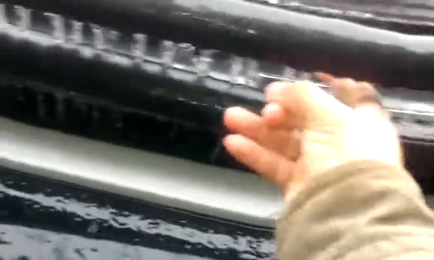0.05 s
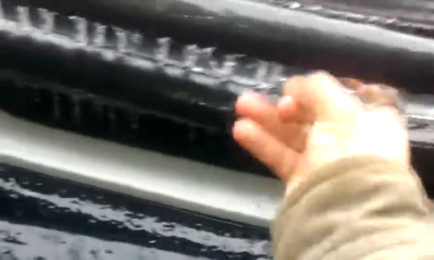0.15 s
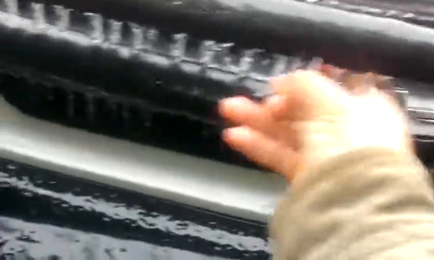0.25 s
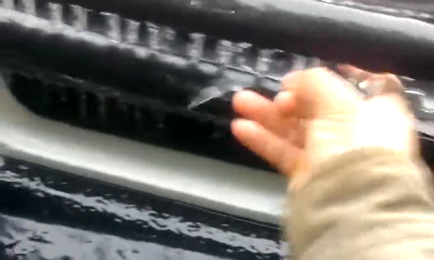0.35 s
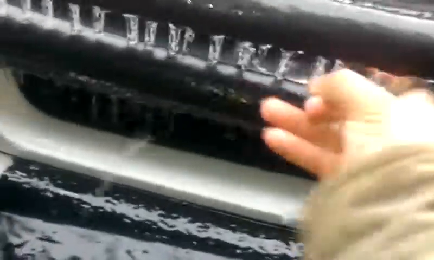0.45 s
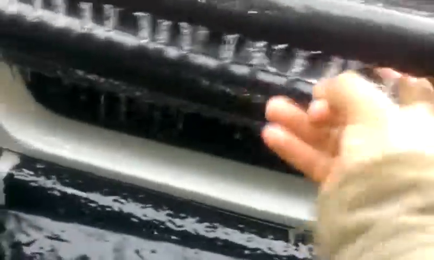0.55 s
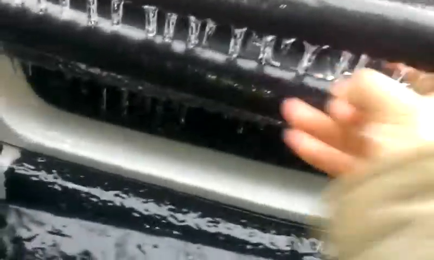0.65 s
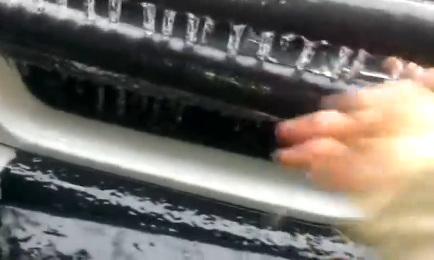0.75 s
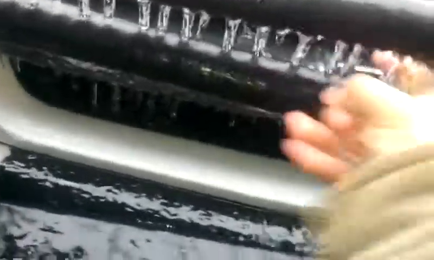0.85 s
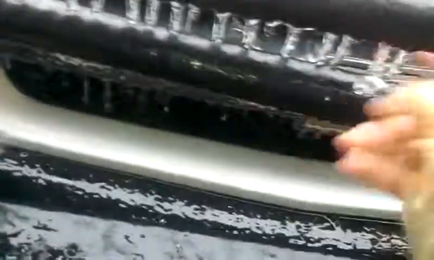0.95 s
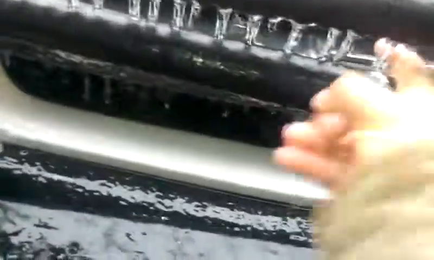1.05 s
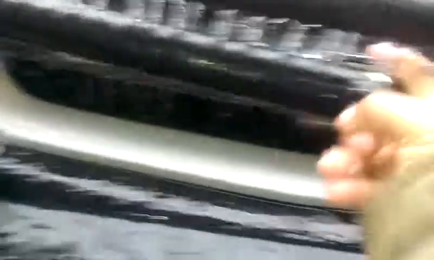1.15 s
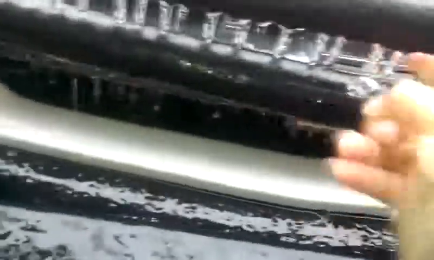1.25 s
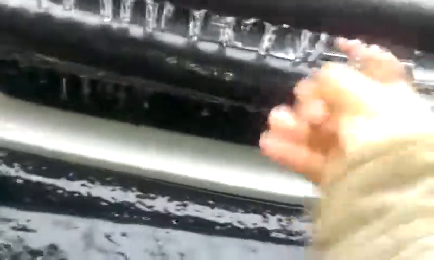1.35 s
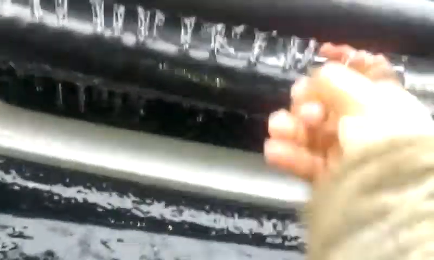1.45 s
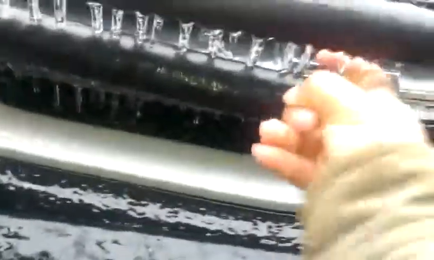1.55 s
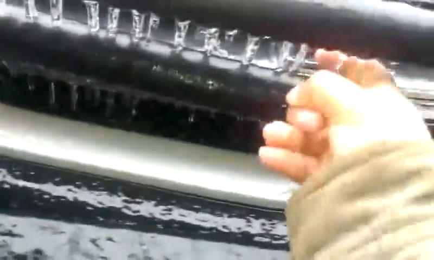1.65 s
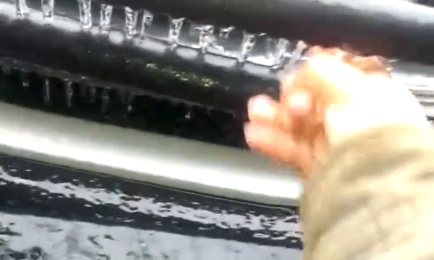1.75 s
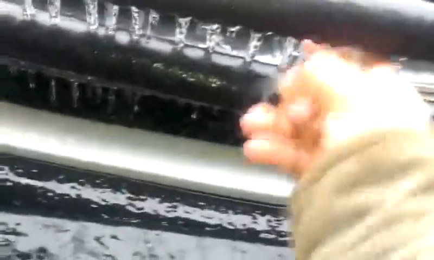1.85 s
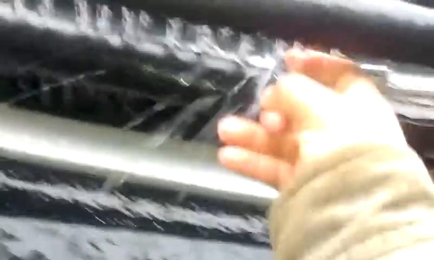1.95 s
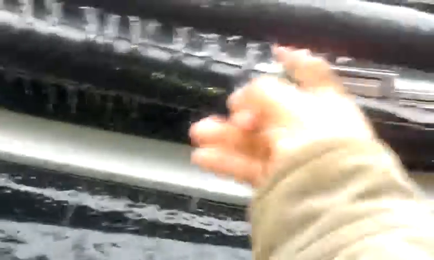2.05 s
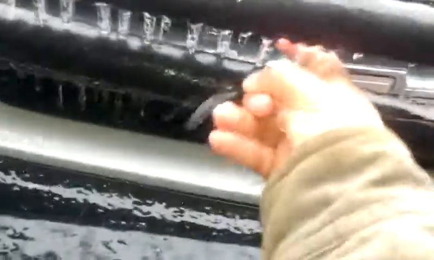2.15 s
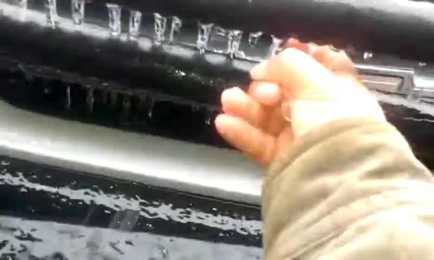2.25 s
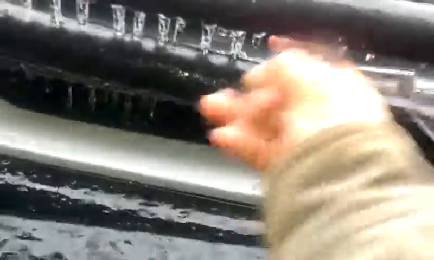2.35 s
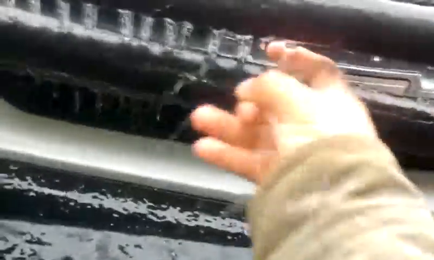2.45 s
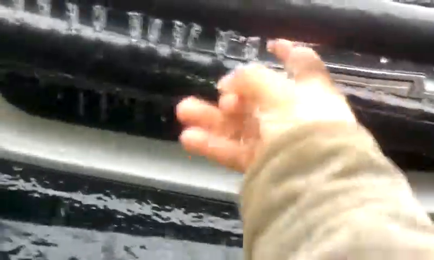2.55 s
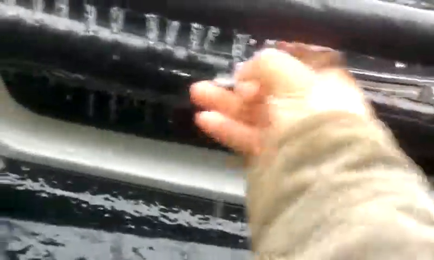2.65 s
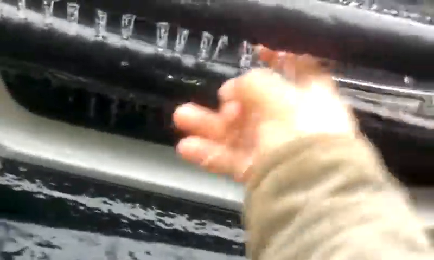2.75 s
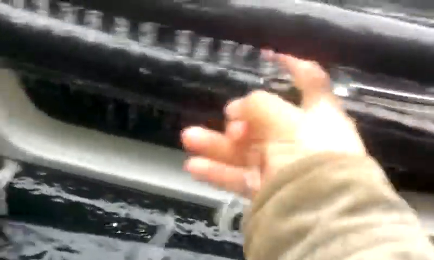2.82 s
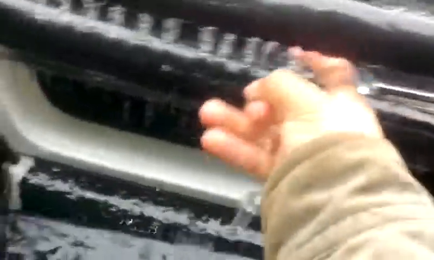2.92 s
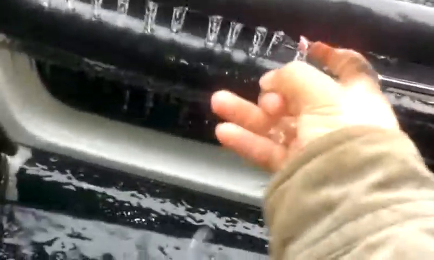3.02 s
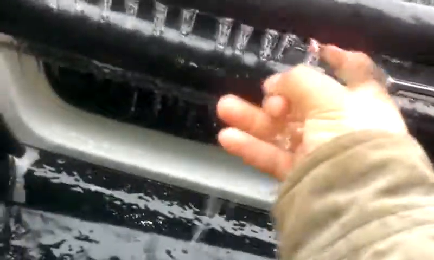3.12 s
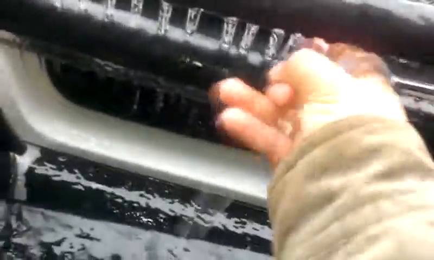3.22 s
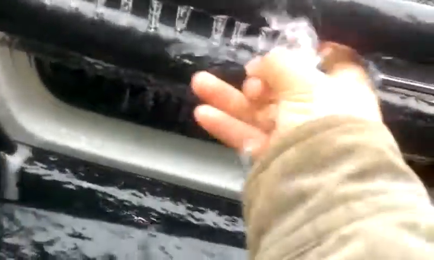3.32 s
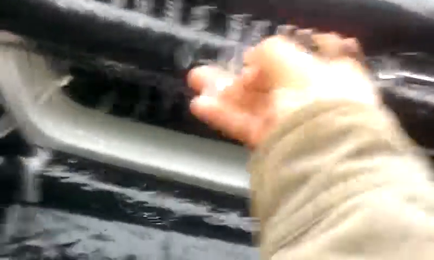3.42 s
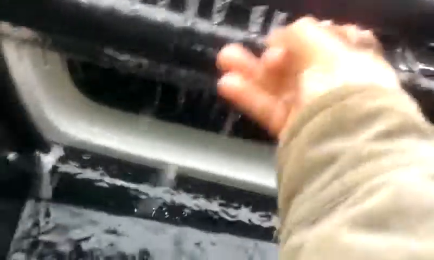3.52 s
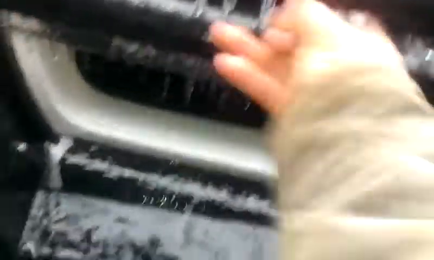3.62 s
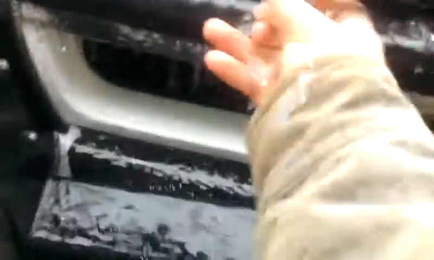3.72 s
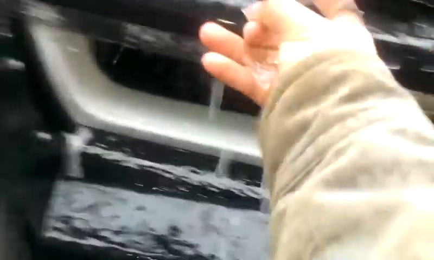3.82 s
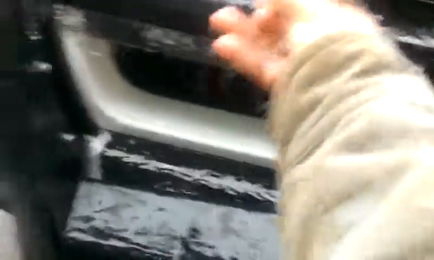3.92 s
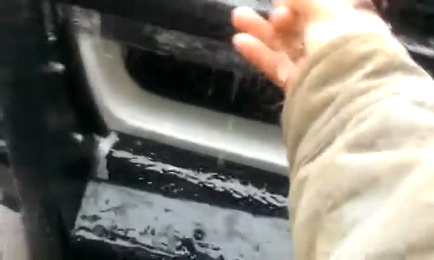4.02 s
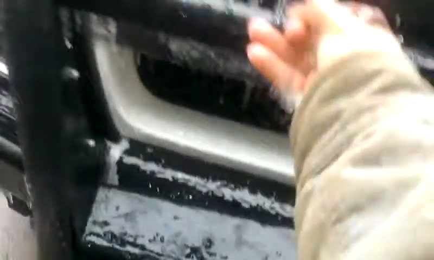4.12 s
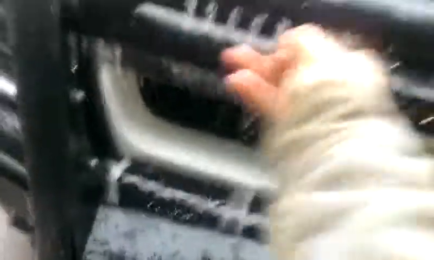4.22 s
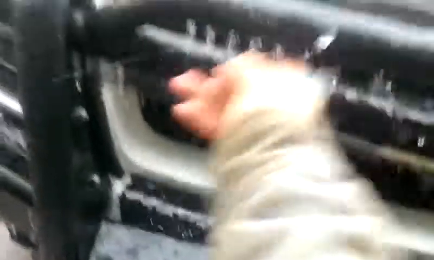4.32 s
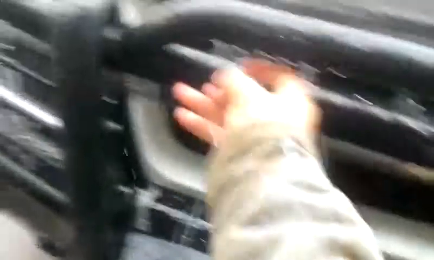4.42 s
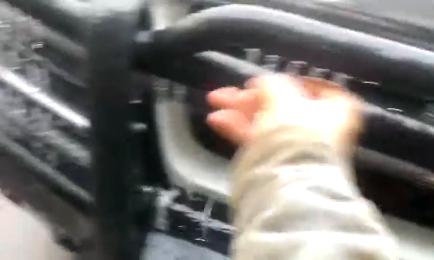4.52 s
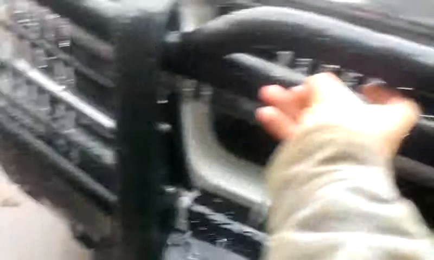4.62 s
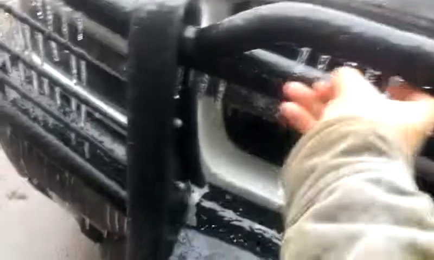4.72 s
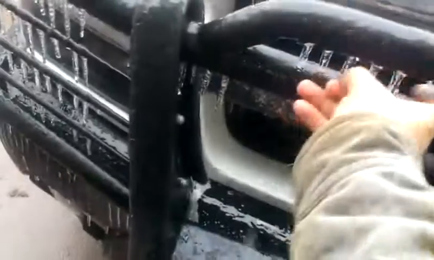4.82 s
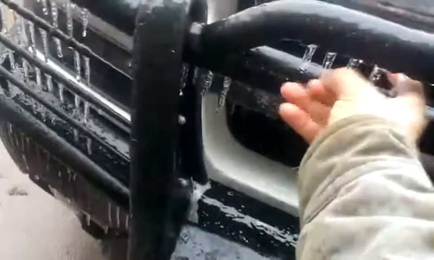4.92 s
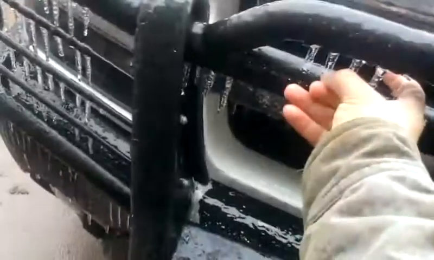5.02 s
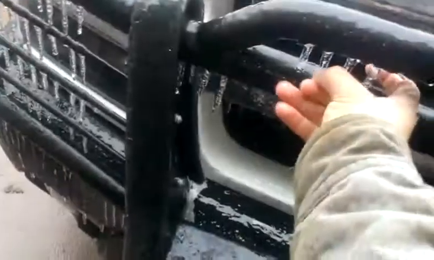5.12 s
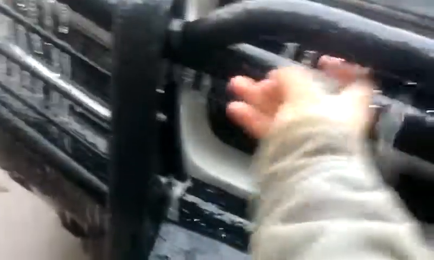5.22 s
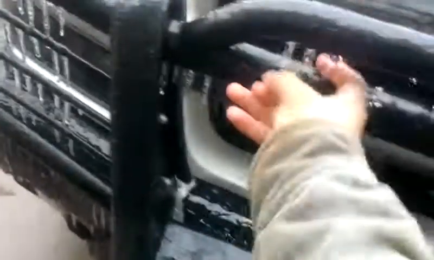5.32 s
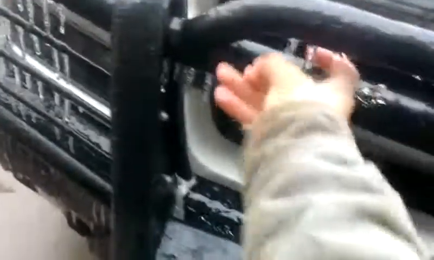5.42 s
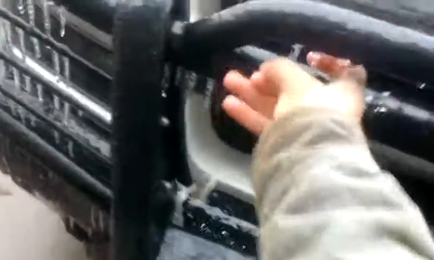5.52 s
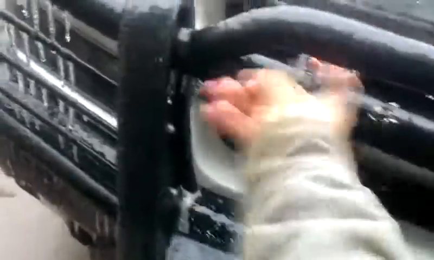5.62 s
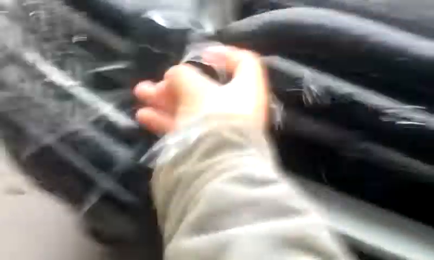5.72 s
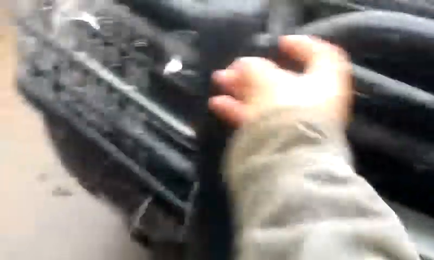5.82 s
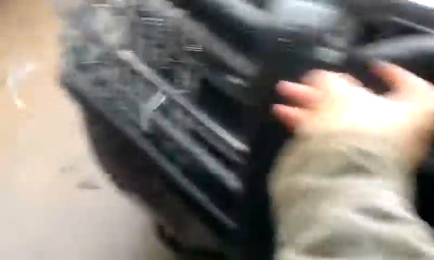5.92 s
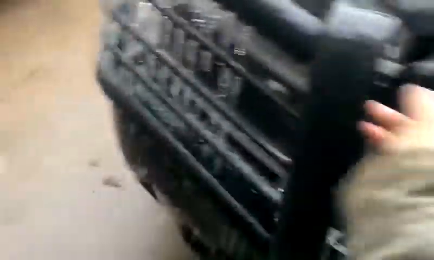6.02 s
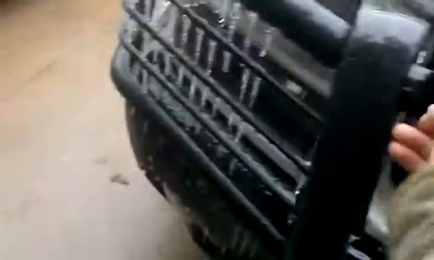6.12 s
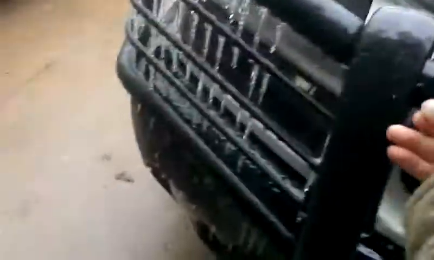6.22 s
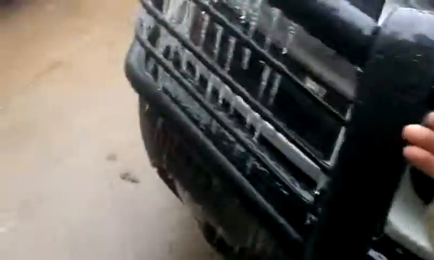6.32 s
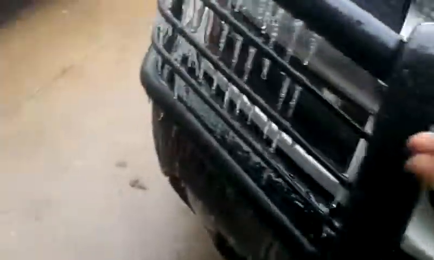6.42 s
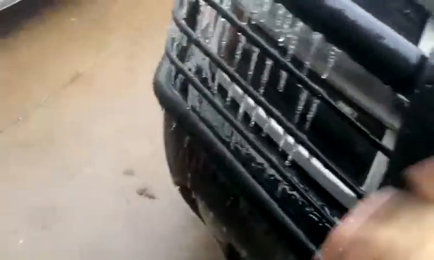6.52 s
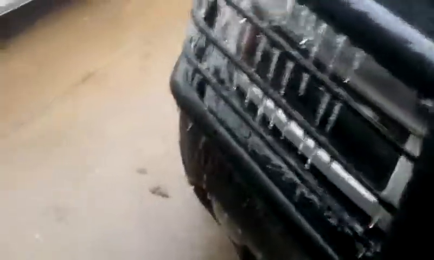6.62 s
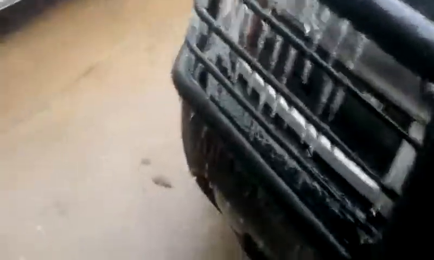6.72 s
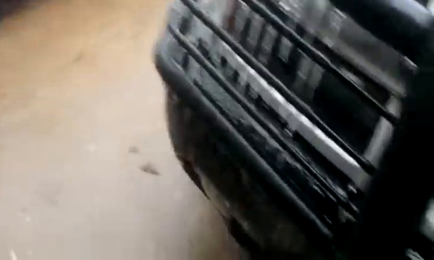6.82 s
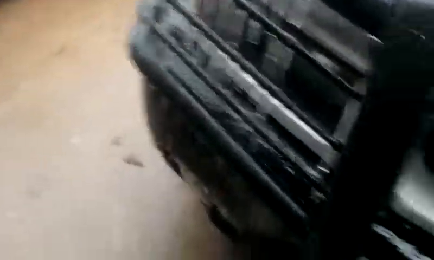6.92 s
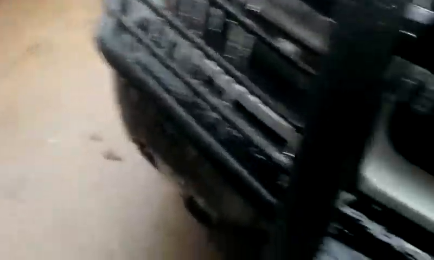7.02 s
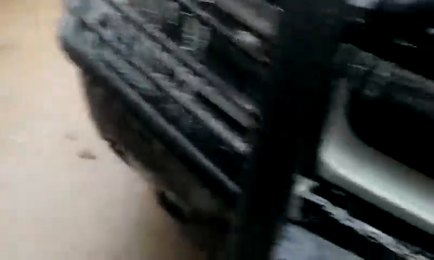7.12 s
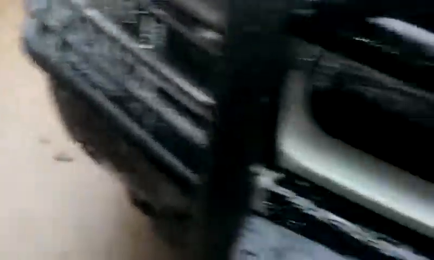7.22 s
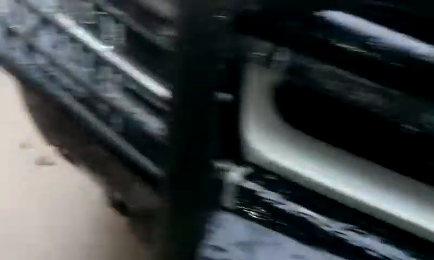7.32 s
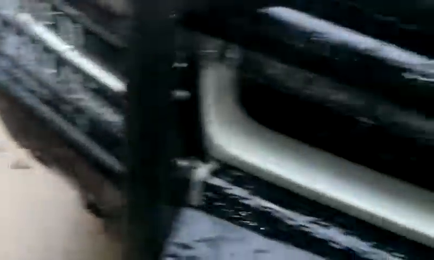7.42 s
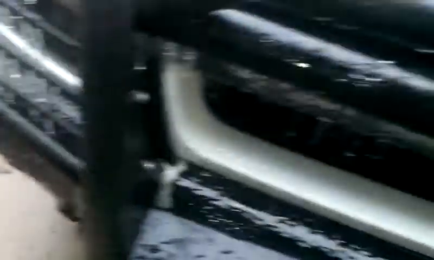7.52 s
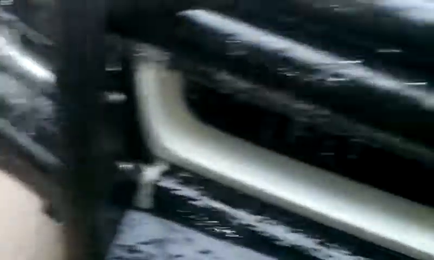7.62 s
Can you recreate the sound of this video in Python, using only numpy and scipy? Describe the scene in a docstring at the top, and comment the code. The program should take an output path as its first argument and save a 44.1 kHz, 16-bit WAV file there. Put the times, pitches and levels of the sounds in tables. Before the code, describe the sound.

Brittle ice cracks sharply and rings briefly, glassy and dry, as pieces are knocked off metal bars. Bursts alternate with short gaps of fine ticking crumbs; the middle is busier, with dull low thuds from the hollow bumper and short metallic ringing. Close stereo phone pickup, quiet outdoor hiss, occasional mechanical ticks at left, and a low far engine at the end.

```python
"""A hand knocks icicles off the steel bars of a vehicle grille, close to a two-port phone microphone.
Noise bursts make the splinters, dying sines the ringing ice and steel, and low noise the thuds on the bumper.
Sparse clicks make the patter of crumbs and short bright noise the chips; the hollow bumper booms in low sines.
The phone's focus motor ticks in the left port. Behind lie shaped noise for outdoor air and a low rumble,
and near the end wavering sines for a far engine that pulls away."""
import sys
import numpy as np
from scipy import signal
from scipy.fft import rfft, irfft
from scipy.io import wavfile
from scipy.ndimage import uniform_filter1d

SR = 44100
rng = np.random.default_rng(int(sys.argv[2]) if len(sys.argv) > 2 else 0)


def to_wav(s):
    """Save 16-bit WAV."""
    ch = np.atleast_2d(s).T  # columns
    pcm = np.round(np.clip(ch, -1, 1) * 32767)  # PCM
    wavfile.write(sys.argv[1], SR, pcm.astype(np.int16))


def magnitude_from_level(level_db):
    """Linear magnitude for a level in decibels (20 dB per decade)."""
    exponent = np.asarray(level_db, float) / 20
    return 10 ** exponent


N = 337801  # length in samples
EDGE_HZ = 10650  # the phone's upper limit

# Colour of breaking ice. Each row: frequency in Hz, relative level in dB per Hz.
ICE_COLOUR = [(410, -30.5), (700, -8), (1210, -2.5), (2210, 4), (3480, -1), (4030, 3), (4950, -1.5),
              (6140, 0), (7890, -6.5), (10600, -15.5), (13800, -57), (22000, -120)]


def evened(x):
    """Scales to an rms (average strength) of 1."""
    return x / np.sqrt(np.mean(x ** 2) + 1e-20)


def read(points, hz):
    """Reads a (Hz, value) table at any frequency, on a log-frequency axis."""
    f, value = np.transpose(points)
    return np.interp(np.log(hz + 1), np.log(f + 1), value)


def curve(rows, axis=1):
    """Reads one column of a time table at every sample."""
    rows = np.array(rows)
    return np.interp(np.arange(N) / SR, rows[:, 0], rows[:, axis])


def add(mix, start, sound):
    """Mixes a sound in at a time in seconds."""
    part = mix[:, round(start * SR):][:, :sound.shape[1]]
    part += sound[:, :part.shape[1]]


def coloured(x, db):
    """Filters by a gain in dB for each frequency of the sound's own spectrum."""
    return irfft(rfft(x) * magnitude_from_level(db), x.shape[-1])


def ring(t, hz, db, t60, start):
    """One dying sine; t60 is the time in seconds to fade by 60 dB, start its phase in turns."""
    return magnitude_from_level(db - 60 * t / t60) * np.sin(2 * np.pi * (hz * t + start))


def noise_bed(spectrum, patchy_db):
    """Steady noise from random short-time spectra with drifting patches, most alike in both ports in the bass."""
    # Likeness of the two ports. Each row: frequency in Hz, left-right likeness from -1 to 1.
    likeness = [(60, 0.69), (170, 0.95), (490, 0.46), (1390, -0.18), (3960, 0.13), (11300, 0.0071)]
    frames, hz = N // 256 + 5, np.fft.rfftfreq(1024, 1 / SR)
    a, b, c, d, patches = rng.standard_normal((frames, 513, 5)).T
    patches = uniform_filter1d(patches, size=10, axis=0)
    patches = evened(uniform_filter1d(patches, size=12, axis=1))
    same = np.clip(read(likeness, hz), -1, 1)[:, None]
    left = a + 1j * b
    right = same * left + np.sqrt(1 - same ** 2) * (c + 1j * d)
    z = np.array([left, right]) * magnitude_from_level(read(spectrum, hz)[:, None] + patchy_db * patches)
    return evened(signal.istft(z, nperseg=1024, noverlap=768)[1][:, :N])


def air():
    """Outdoor hiss and a low background rumble: two noise beds whose levels rise and fall."""
    # Colour of the hiss. Each row: frequency in Hz, relative level in dB per Hz.
    hiss_colour = [(15, -58), (25, -16), (43, -16), (67, -6), (98, -3.5), (123, -1), (194, -13),
                   (257, -11.5), (577, -11), (762, -8.5), (1140, -10.5), (2770, -16.5), (3390, -20),
                   (5920, -25.5), (10600, -43), (13800, -79), (22000, -120)]
    # Level of the hiss over time. Each row: time in seconds, level in dB before a steady lift.
    hiss_level = [(0.0, -53.5), (0.2, -64), (0.85, -58), (1.43, -66), (2.7, -62), (5.2, -61), (5.76, -59),
                  (6.25, -65.5), (6.55, -62), (7.66, -63.5)]
    # Level of the low background rumble over time. Each row: time in seconds, level in dB before a steady cut.
    rumble_level = [(0, -69.5), (1.8, -67), (1.98, -52.5), (2.6, -68), (3.3, -71.5), (4.5, -60), (5, -70),
                    (6.2, -62.5), (6.65, -51), (7.66, -53.5)]
    rumble_colour = [(50, -30.5), (75, 7), (160, 2.0), (320, 2.5), (600, -76.5)]  # (Hz, dB)
    hiss = magnitude_from_level(curve(hiss_level) + 3.5) * noise_bed(hiss_colour, patchy_db=1.82)
    rumble = magnitude_from_level(curve(rumble_level) - 7.0) * noise_bed(rumble_colour, patchy_db=2.5)
    return hiss + rumble


def hit(ring_hz, thud_db, t60, chance, dice):
    """Ice breaks in many tiny cracks, the piece rings as a rod and the bumper thuds; peak near 1."""
    # Modes of an ice rod. Each row: multiple of its ring, level in dB before a shared cut.
    rod_modes = [(1, 13), (1.62, -26), (2.76, -8.5), (.6, -3.5)]
    # Dull knock of the bumper. Each row: frequency in Hz, relative level in dB per Hz.
    knock_colour = [(90, -12.5), (200, -6.5), (450, -5), (820, -8.5), (1400, -23), (4000, -58.5)]
    t, hz = np.arange(chance.shape[1]) / SR, np.fft.rfftfreq(chance.shape[1], 1 / SR)
    t60 = np.clip(t60, .008, .1)
    rise = (1 - np.exp(-t / .0012)) ** 2

    # small high pieces crack brighter: 3 dB more for each octave of ring
    treble_db = 3 * np.log2(ring_hz / 3000)
    colour = read(ICE_COLOUR, hz) + treble_db * np.clip(np.log2((hz + 1) / 3500), -.6, 1.2)
    # the cracks excite the piece's own pitch
    colour = colour + 9 / (1 + ((hz - ring_hz) / (.05 * ring_hz)) ** 2)

    # the break runs in jerks, as many tiny cracks
    jerks = magnitude_from_level(4.5 * evened(uniform_filter1d(chance[4], size=36)))
    splinters = evened(coloured((0.63 * chance[:2] + chance[2]) * jerks, colour))
    crack = magnitude_from_level(-5.5) * splinters * magnitude_from_level(-60 * t / t60)

    # duller echoes inside the grille
    echoes = evened(coloured(chance[:2, ::-1], colour - 3 * np.log2(1 + hz / 3000)))
    scatter = magnitude_from_level(-15.5) * echoes * magnitude_from_level(-60 * t / 0.13) * (1 - np.exp(-t / 0.0039))

    rod = sum(ring(t, ring_hz * k, db - 9, 0.25 * t60, dice[n]) * (ring_hz * k < EDGE_HZ)
              for n, (k, db) in enumerate(rod_modes))
    # shards of all sizes ping as they part
    shards = sum(ring(t, 3000 * 2.5 ** d, -15 - 7 * d, .04, 7 * d) for d in dice[6:])

    low = evened(coloured(chance[3] + .5 * chance[:2], read(knock_colour, hz)))
    thud = magnitude_from_level(thud_db - 8.0) * low * magnitude_from_level(-60 * t / (0.04 + 1.3 * t60)) * (1 - np.exp(-t / 0.0091))
    return rise * (crack + rod + shards) + scatter + thud


def icicles():
    """All hits; each reaches the right port a little earlier and lands somewhat left or right."""
    # Every crack and clink. Each row: start in seconds, level in dB before a shared lift, ring of the piece in Hz,
    # thud in dB against the hit before a shared cut, fade time (t60) in seconds before it is kept within bounds.
    blows = [(0.0608, -34, 1150, -22.5, 0.051), (0.0972, -44, 1570, -6.5, 0.074),
             (0.1144, -43, 830, -17.5, 0.1), (0.146, -44, 1390, -3.5, 0.15),
             (0.1757, -19.5, 1610, -15, 0.032), (0.1824, -30.5, 1500, -20.5, 0.062),
             (0.1888, -28, 862, -14, 0.093), (0.2113, -20.5, 1250, -13, 0.039),
             (0.2625, -26, 2430, -15.5, 0.076), (0.2773, -19.5, 2340, -40, 0.069),
             (0.2903, -22.5, 6970, -18.5, 0.072), (0.3013, -24.5, 1580, -15.5, 0.032),
             (0.326, -34.5, 1690, -12, 0.031), (0.3352, -33, 1500, -9, 0.038),
             (0.4038, -40.5, 2780, -11, 0.042), (0.4334, -39, 2800, -19.5, 0.043),
             (0.4938, -40.5, 3010, -16, 0.062), (0.5467, -38, 3160, -6.5, 0.076),
             (0.5555, -33, 1730, -17, 0.05), (0.6439, -34.5, 830, -8, 0.048),
             (0.7009, -34, 4080, -18, 0.036), (0.7647, -48, 1810, -10, 0.055),
             (0.7765, -39.5, 1550, -37, 0.08), (0.7882, -29, 1810, -37, 0.035),
             (0.8154, -30.5, 2440, -20, 0.017), (0.8894, -21.5, 1120, -9, 0.054),
             (0.8954, -18.5, 806, -13, 0.028), (0.9798, -35, 4270, -13, 0.026),
             (0.9926, -35.5, 1390, -20, 0.05), (1.1388, -42.5, 1620, -20, 0.046),
             (1.2146, -35.5, 2980, -17, 0.023), (1.2232, -39, 2940, -22, 0.11),
             (1.2469, -48, 2780, -3, 0.04), (1.263, -42, 4280, -21.5, 0.057),
             (1.5585, -42.5, 5800, -6, 0.036), (1.659, -48, 4030, -8, 0.046),
             (1.913, -22, 2320, -17, 0.051), (1.974, -44, 2980, -5, 0.06), (2.0416, -45, 2770, -3.5, 0.04),
             (2.1228, -46.5, 5970, -10, 0.05), (2.2138, -44, 980, -10.5, 0.032),
             (2.4064, -22.5, 3980, -8.5, 0.05), (2.4286, -26, 4110, -10.5, 0.12),
             (2.437, -39, 2460, -19.5, 0.056), (2.4484, -33, 5200, -9.5, 0.029),
             (2.4545, -40, 4000, -14, 0.069), (2.4783, -41, 2600, -18, 0.025),
             (2.5, -42.5, 2670, -4, 0.047), (2.5835, -40.5, 2520, -3, 0.031), (2.708, -44, 2400, -25, 0.15),
             (2.7381, -28.5, 3850, -20, 0.052), (2.807, -30.5, 8010, -28, 0.042),
             (2.8117, -29, 4020, -8.5, 0.028), (2.8385, -40, 2800, -10, 0.036),
             (2.8667, -42, 2760, -4, 0.038), (3.0637, -28, 2300, -22.5, 0.039),
             (3.0717, -30.5, 6230, -7, 0.05), (3.0834, -28, 4150, -28.5, 0.043),
             (3.0898, -34.5, 6600, -27, 0.046), (3.1246, -34, 1680, -11, 0.05),
             (3.133, -37, 2390, -21, 0.021), (3.2125, -34.5, 4220, -8, 0.023),
             (3.2475, -37, 2650, -9.5, 0.05), (3.2955, -38.5, 3900, -6.5, 0.05),
             (3.3271, -17.5, 3900, -8.5, 0.027), (3.3552, -33, 4130, -7.5, 0.056),
             (3.4228, -25.5, 3980, -17.5, 0.054), (3.4434, -48, 2930, -2, 0.017),
             (3.5585, -42, 3050, -16, 0.065), (3.6143, -43.5, 1870, 1, 0.03),
             (3.641, -39.5, 1180, 9, 0.035), (3.679, -26, 2680, -3.5, 0.038),
             (3.7015, -31.5, 2540, -6, 0.054), (3.7164, -19.5, 2080, -12.5, 0.064),
             (3.7838, -39.5, 2750, -11, 0.13), (3.8709, -44.5, 2645, -30, 0.1),
             (3.928, -40, 6080, -13, 0.017), (4.0146, -41.5, 3840, -3, 0.034),
             (4.0517, -40.5, 810, -3, 0.054), (4.1095, -31, 2030, -10.5, 0.05),
             (4.1254, -40.5, 2780, -7, 0.036), (4.1779, -37, 6000, -8, 0.022),
             (4.285, -26.5, 1630, -13, 0.025), (4.3193, -18, 2277, -11.5, 0.045),
             (4.3444, -32, 1970, -6.5, 0.072), (4.583, -25, 4310, -17, 0.026),
             (4.5961, -32.5, 2360, -26, 0.039), (4.6077, -26.5, 3790, -31, 0.035),
             (4.6224, -34.5, 3080, -6, 0.02), (4.6517, -36, 2240, -12, 0.047),
             (4.6694, -31, 3720, -21, 0.026), (4.6923, -25.5, 2410, -23, 0.047),
             (4.7026, -30.5, 2340, -33, 0.091), (4.769, -38, 2360, -46.5, 0.021),
             (4.8074, -35.5, 5440, -21, 0.049), (4.93, -43, 2600, -18, 0.032),
             (4.9775, -43, 4540, -10, 0.054), (5.0434, -40.5, 6940, -45.5, 0.026),
             (5.1033, -38.5, 5660, -8.5, 0.032), (5.2115, -41, 4730, -6, 0.039),
             (5.2483, -27.5, 2330, -11.5, 0.062), (5.2764, -39.5, 2260, -1, 0.092),
             (5.3148, -46, 2520, -13, 0.037), (5.348, -34.5, 810, -8, 0.017),
             (5.4122, -42.5, 1520, -25, 0.065), (5.4222, -28, 2190, -18, 0.045),
             (5.5034, -41, 2400, -9.5, 0.14), (5.5243, -22, 1510, -14, 0.033), (5.5416, -45, 1360, 0, 0.03),
             (5.6273, -23, 5940, -17, 0.051), (5.6344, -26, 3600, -39.5, 0.038),
             (5.7142, -34, 4000, -5, 0.11), (5.7308, -17, 5680, -13.5, 0.028),
             (5.7652, -33, 5400, -5.5, 0.035), (5.881, -40, 940, -9, 0.1),
             (5.9216, -36.5, 1700, -26, 0.029), (6.004, -44.5, 3760, -18, 0.044),
             (6.102, -49, 5800, -10, 0.05), (6.2882, -44, 3800, -5, 0.063), (6.3431, -37, 4420, -12, 0.028)]
    out, length = np.zeros((2, N)), 4096
    chance, dice = rng.standard_normal((len(blows), 5, length)), rng.random((len(blows), 9))
    for (start, db, ring_hz, thud_db, t60), z, d in zip(blows, chance, dice):
        sound = hit(ring_hz, thud_db, t60, z, d)
        lag = int(3 + 8 * d[4])  # samples
        sound[0] = np.roll(sound[0], lag) * (np.arange(length) >= lag)
        side = magnitude_from_level(3 * (d[5] - .5) * np.array([[1], [-1]]))
        add(out, start, magnitude_from_level(db + 3) * sound * side)
    return out


def crumbs(hits):
    """A fine patter of ice grains while and after pieces break: dense weak clicks in clumps."""
    smoothing = 1 / (.15 * SR)  # the patter lingers for about 0.15 s
    busy = signal.lfilter([smoothing], [1, smoothing - 1], abs(hits).mean(0))
    clumps = magnitude_from_level(1.13 * evened(uniform_filter1d(rng.standard_normal(N), size=150)))
    clicks = rng.random((2, N)) < 1500 / SR  # about 1500 a second in each port
    grains = rng.standard_normal((2, N)) * clicks * clumps
    colour = read(ICE_COLOUR, np.fft.rfftfreq(N, 1 / SR))
    return magnitude_from_level(-30) * busy ** 0.7 * evened(coloured(grains, colour))


def bars(strikes):
    """Bars and post ring on with whatever strikes them; each mode varies as the hand moves along."""
    # Steel bar modes. Each row: frequency in Hz, relative level in dB, fade time (t60) in seconds.
    bar_modes = [(2430, -11, .06), (2570, -8, .07), (2830, -2, .1), (2930, -6, .07), (3720, -9, .05),
                 (4030, -6, .05), (6140, -3, .04), (7810, 4, .025)]
    # Modes of the post at the end of the bars. Each row: frequency in Hz, relative level in dB, t60 in seconds.
    post_modes = [(2430, -6, .11), (2860, -5, .11), (3133, -3, .11), (3660, -11, .1), (4011, -8, .1),
                  (4264, -7, .1), (4969, -3, .1), (5351, -5, .1), (5770, -2, .1), (6137, -3, .09)]
    # How much of each blow the steel takes up. Each row: time in seconds, bars in dB, post in dB.
    uptake = [(0, -52, -70), (1.2, -48, -70), (1.9, -40, -70), (4.2, -42, -62), (4.6, -48, -42),
              (5.0, -50, -41), (5.3, -52, -52), (6.5, -54, -52)]
    t, out = np.arange(SR // 6) / SR, np.zeros((2, N))
    for column, modes in enumerate((bar_modes, post_modes), 1):
        for hz, db, t60 in modes:
            place = np.interp(np.arange(N) / SR, np.arange(0, 8, .125), rng.standard_normal(64))
            struck = strikes[1] * magnitude_from_level(2 * place + curve(uptake, axis=column))
            mode = ring(t, hz, db, t60, rng.random((2, 1)))
            out += signal.oaconvolve(struck[None], mode, axes=1)[:, :N]
    return out


def chips():
    """Tiny chips tick on the steel as they fall, dry and bright: clear ones, and fainter strays at random."""
    # The clearest chips. Each row: start in seconds, level in dB at the start.
    clear = [(0.254, -39), (1.153, -53.5), (2.06, -56), (2.156, -55), (2.39, -55), (2.535, -53),
             (2.68, -54.5), (2.917, -55), (2.962, -54), (3.053, -50), (3.194, -48), (3.536, -54.5),
             (3.597, -50), (3.882, -52), (3.993, -51.5), (4.077, -55), (4.236, -57), (4.505, -55.5),
             (4.856, -52.5), (5.021, -56), (5.111, -51), (5.333, -50), (5.376, -51), (5.391, -50),
             (5.611, -47), (6.415, -52.5)]
    t60, strays_per_s, busy_s = .022, 10, 6.4
    count = int(strays_per_s * busy_s)
    strays = rng.random((count, 2)) * [busy_s, 8] + [0, -63]  # from -63 to -55 dB
    t, out = np.arange(1024) / SR, np.zeros((2, N))
    hz = np.fft.rfftfreq(1024, 1 / SR)
    colour = read(ICE_COLOUR, hz) + read([(1500, -11), (4000, -1.5), (8000, -1)], hz)
    for (start, db), z in zip([*strays, *clear], rng.standard_normal((count + len(clear), 3, 1024))):
        add(out, start, magnitude_from_level(db - 60 * t / t60) * evened(coloured(z[:2] + z[2], colour)))
    return out


def focus_motor():
    """Each step is a push, a longer swing back and a short rattle of the housing, in the left port only."""
    # Steps of the focus motor. Each row: time in seconds, level in dB.
    steps = [(0.5442, -42), (0.5579, -25), (0.6126, -35), (0.6212, -35), (0.6244, -25), (0.6369, -32),
             (0.645, -33.5), (0.6485, -45), (0.6528, -32), (0.6606, -32.5), (0.6649, -28.5), (0.8458, -25),
             (0.8539, -35), (0.8569, -33), (0.8655, -35), (0.881, -31), (5.1957, -26.5), (5.2736, -35),
             (5.284, -37), (5.295, -25.5), (5.3568, -26), (5.407, -39), (5.4147, -35.5), (5.4385, -33.5)]
    t = np.arange(-30, 500) / SR
    push = np.exp(-(t / 0.00017) ** 2)
    swing = -0.67 * np.exp(-((t - .0008) / 0.00047) ** 2) + 0.13 * np.exp(-((t - .0028) / 0.0014) ** 2)
    rattle = ring(t, 2760, -16.5, 0.014, 0) + ring(t, 4200, -10.0, 0.0024, 0) + ring(t, 5300, 0, 0.00093, 0)
    step = push + swing + (t > 0) * rattle
    out = np.zeros((2, N))
    for s, db in steps:
        add(out, s + t[0], magnitude_from_level(db) * step * np.array([[1], [0]]))
    return out


def booms():
    """The hollow bumper booms: a low panel mode and a looser one below it swell for a few ms and die."""
    # Low bumper booms with some of the hits. Each row: start in seconds, level in dB, panel mode in Hz.
    panel_booms = [(1.913, -48, 296), (2.411, -38, 455), (2.44, -41, 362), (2.809, -45.5, 426),
                   (2.831, -43.5, 310), (3.329, -45, 473), (3.357, -49.5, 152), (3.648, -42, 276),
                   (3.68, -41, 436), (3.714, -45, 205), (4.32, -44, 333), (4.348, -43.5, 290),
                   (5.251, -51, 292), (5.734, -46, 331)]
    t60 = 0.13  # seconds
    t, out = np.arange(SR // 5) / SR, np.zeros((2, N))
    for (s, db, hz), start in zip(panel_booms, rng.random((len(panel_booms), 2))):
        panel = ring(t, hz, db, t60, start[0])
        looser = ring(t, 0.6 * hz, db - 12, 3.35 * t60, start[1])
        add(out, s, np.tile((panel + looser) * (1 - np.exp(-t / 0.0019)), (2, 1)))
    return out


def tone(rows, multiples, waver_db):
    """Sines on a pitch curve, each with its own slow waver in level, faded at both ends."""
    t = np.arange(N) / SR
    fade_in = np.clip((t - rows[0][0]) / 0.088, 0, 1)
    fade_out = np.clip((rows[-1][0] + 0.11 - t) / 0.095, 0, 1)
    turns, out = np.cumsum(curve(rows)) / SR, 0
    for k, db in multiples:
        waver = uniform_filter1d(rng.standard_normal(N), size=2500)
        waver = evened(uniform_filter1d(waver, size=2500))
        depth_db = waver_db * (1 if k != 1 else .6)  # the main tone is steadier
        out = out + magnitude_from_level(db + depth_db * waver) * np.sin(2 * np.pi * (k * turns + rng.random()))
    return np.sqrt(2) * magnitude_from_level(curve(rows, axis=2)) * fade_in * fade_out * out


def engine():
    """A far engine pulls away: its firing tone with multiples, then a higher exhaust tone."""
    # Firing tone. Each row: time in seconds, pitch in Hz, level in dB.
    firing = [(6.2, 84.2, -64), (6.45, 78.3, -60), (6.5, 82.6, -50), (6.6, 87.9, -57.5),
              (7.2, 96.05, -58.5), (7.4, 97.6, -74)]
    # Its companions. Each row: multiple of the firing tone, level against it in dB.
    companions = [(1.4, -16), (2, -9), (2.33, -28), (2.8, -19.5), (3.6, -22)]
    # Exhaust tone. Each row: time in seconds, pitch in Hz, level in dB.
    exhaust = [(7.14, 263.6, -75), (7.29, 282.3, -57.5), (7.5, 283.2, -67.5), (7.66, 283.4, -61.5)]
    return tone(firing, [(1, 0)] + companions, waver_db=4) + tone(exhaust, [(1, 0)], waver_db=2)


def scene():
    """Near ice and steel through the two ports, the motor, the engine and the air."""
    # The two ports colour near sounds differently. Each row: frequency in Hz, left minus right in dB.
    port_colour = [(60, 0), (140, -0.5), (340, 0.5), (820, -8.5), (1970, -2), (4720, 4), (11300, -15.5)]
    hits = icicles() + chips()
    patter = crumbs(hits)
    near = hits + patter + bars(hits + magnitude_from_level(6) * patter) + booms()
    half_db = read(port_colour, np.fft.rfftfreq(N, 1 / SR)) / 2
    near = coloured(near, np.array([half_db, -half_db]))
    return near + focus_motor() + engine() + air()


def roll_off(x):
    """The treble ends steeply here."""
    return signal.sosfilt(signal.butter(12, 11890, fs=SR, output="sos"), x)


def record(dry):
    """The phone cuts the deep bass and the top."""
    bass_db = read([(30, -3), (45, -12), (62, -15.0), (78, -1)], np.fft.rfftfreq(N, 1 / SR))
    bass_cut = coloured(dry, bass_db)
    edge = signal.firwin(301, EDGE_HZ, window=("kaiser", 5), fs=SR)
    mix = signal.oaconvolve(bass_cut, edge[None], "same")
    return roll_off(mix)


dry = scene()
out = record(dry)
to_wav(out)
```